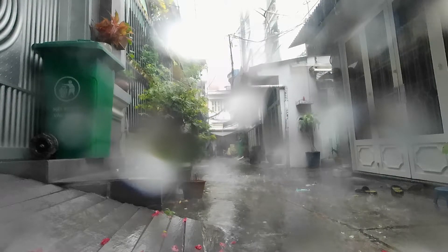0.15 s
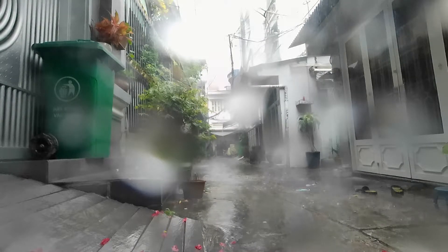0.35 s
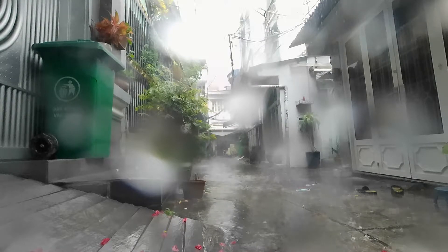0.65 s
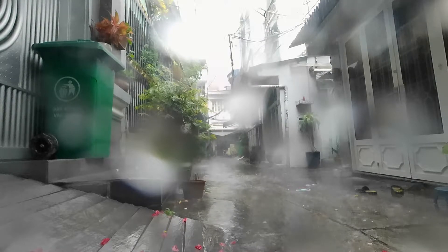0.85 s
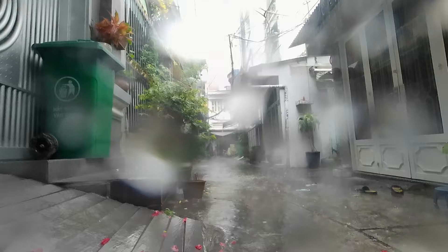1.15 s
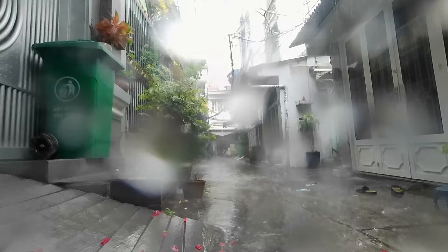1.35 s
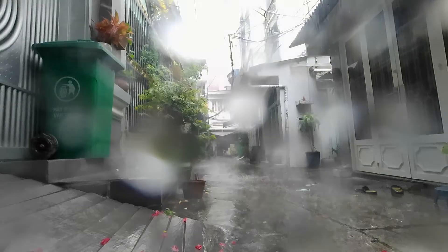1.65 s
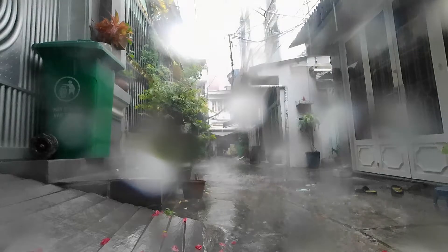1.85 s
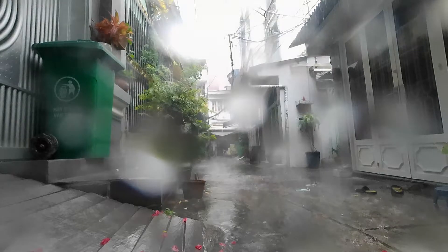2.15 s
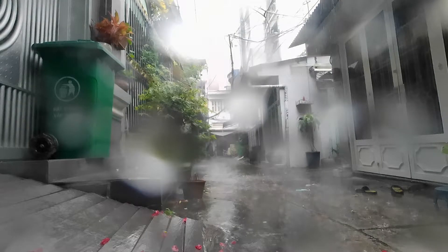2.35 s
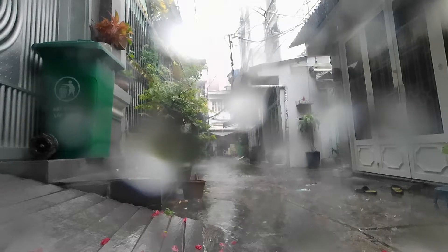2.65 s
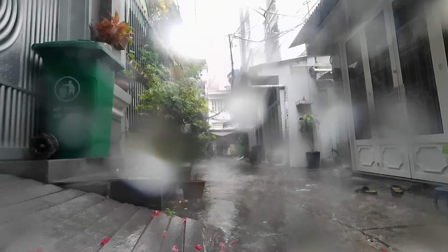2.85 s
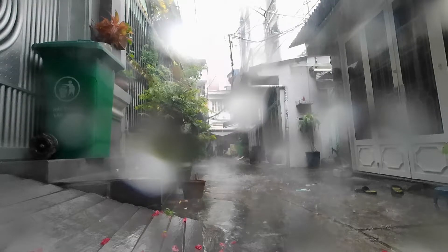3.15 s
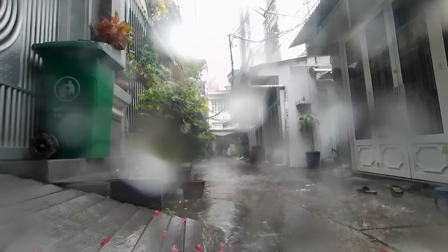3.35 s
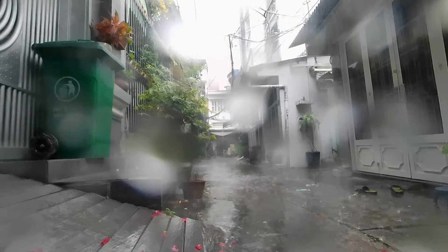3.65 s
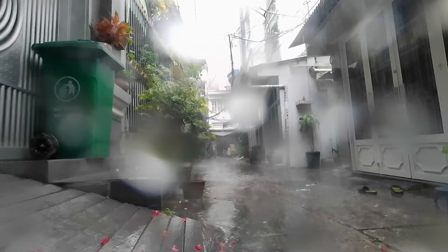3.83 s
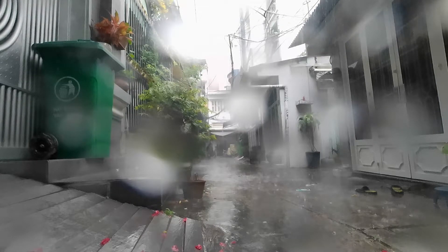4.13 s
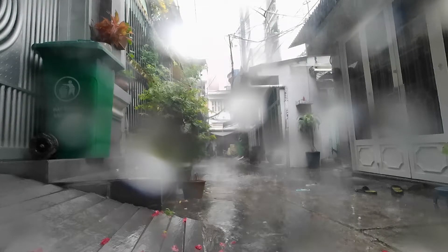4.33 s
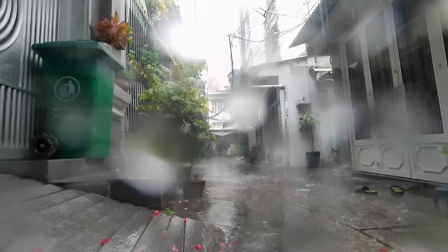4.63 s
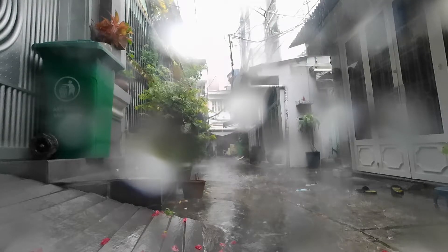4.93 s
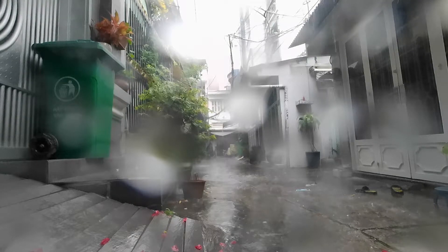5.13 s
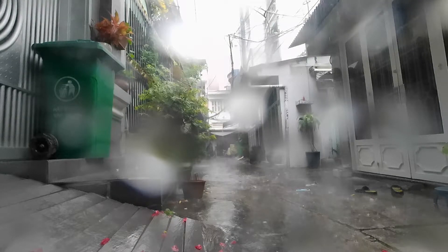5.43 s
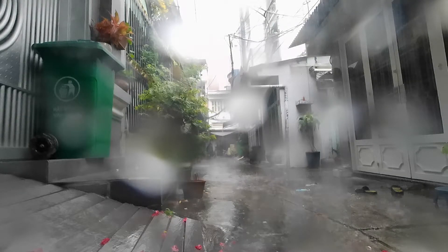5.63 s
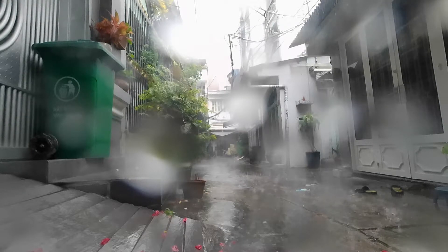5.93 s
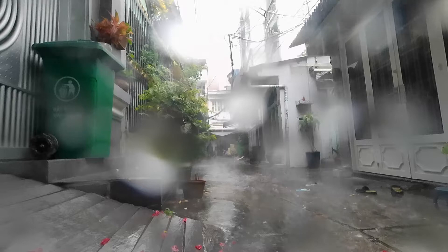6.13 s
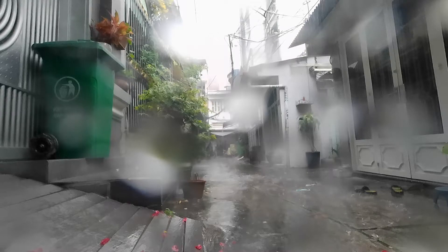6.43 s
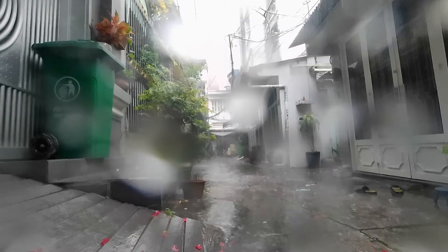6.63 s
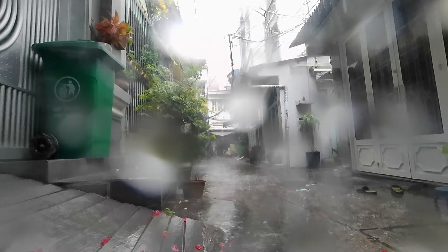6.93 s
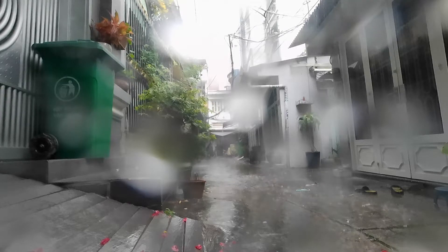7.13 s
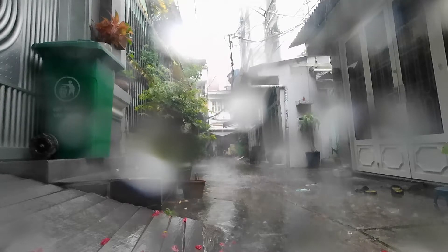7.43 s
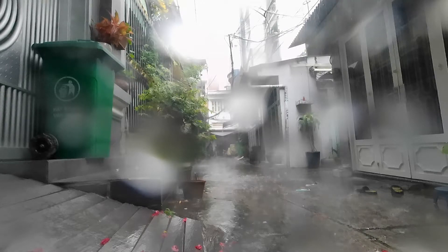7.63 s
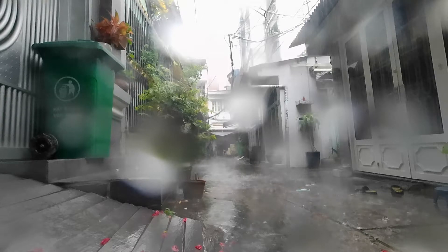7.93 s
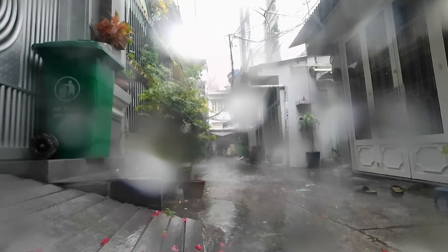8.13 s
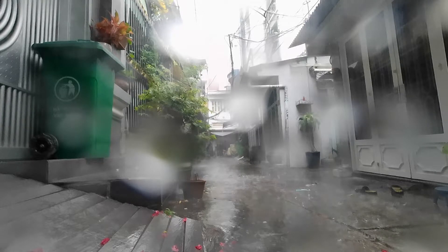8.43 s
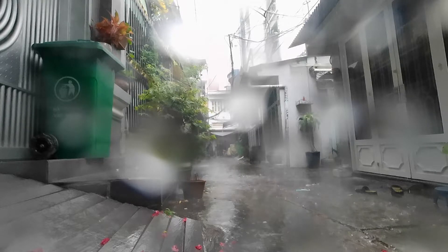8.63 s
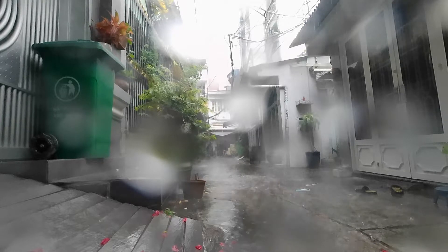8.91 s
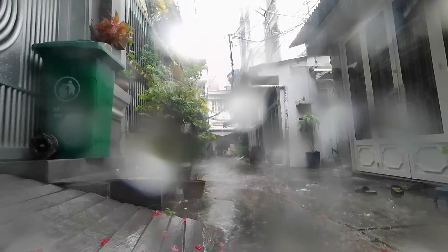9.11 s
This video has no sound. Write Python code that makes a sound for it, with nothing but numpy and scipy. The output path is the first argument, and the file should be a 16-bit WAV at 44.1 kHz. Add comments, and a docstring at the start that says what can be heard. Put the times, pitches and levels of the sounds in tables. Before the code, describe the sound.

Heavy rain hisses steadily in an alley while drops strike a small plastic housing with sharp, hollow ticks and knocks, growing harder and denser.

```python
"""Downpour on a plastic housing

Heavy rain in an alley, heard from inside a small plastic camera housing that stands in the open.
The downpour is a wavering hiss: noise shaped by the resonances of the hollow case.
Drops that land on the case ring its parts as decaying sines, mixed by where they land, plus a burst of spray.
The heavy ones set the mount humming and overload the microphone; fine droplets tick in between."""
import sys
import numpy as np
from scipy import signal
from scipy.fft import rfft, irfft
from scipy.io import wavfile
from scipy.ndimage import uniform_filter1d

SR = 44100
rng = np.random.default_rng(int(sys.argv[2]) if len(sys.argv) > 2 else 0)


def int16_out(signal):
    """Quantize to a 16-bit WAV file."""
    q = np.round(np.clip(np.atleast_2d(signal).T, -1, 1) * 32767)
    wavfile.write(sys.argv[1], SR, q.astype(np.int16))


N = 408807

# Tone of the downpour through the plastic. Each row: frequency in Hz, relative level in dB per Hz.
DOWNPOUR_TONE = [(20, -6.5), (65, -4.5), (110, -8.5), (170, -12), (330, -15), (480, -12.5), (700, -14.5),
                 (1050, -10.5), (2500, -27), (3700, -30.5), (5700, -21), (6800, -30), (10300, -29.5),
                 (12800, -36.5), (16000, -34.5)]
# Resonances the downpour excites in the case. Each row: centre in Hz, nominal width in Hz,
# peak in dB on the scale of the tone above.
HOLLOW_PEAKS = [(72.8, 8.8, 1), (222, 42, -12.5), (1215.6, 95, 1), (1563, 88, -8), (1780, 234, -5),
                (2047, 242, -7), (2953, 475, -11), (4047, 174, -12.5), (4690, 770, -15), (7930, 1500, -29)]
# Swell of the rain; only departures from the median count. Each row: time in seconds,
# strength in dB before scaling by SWELL_DEPTH.
SHOWER_SWELL = [(0.0, -47), (0.41, -48.5), (6.22, -48), (6.38, -47), (6.58, -48), (7.59, -47), (7.8, -46),
                (8.05, -47.5), (9.27, -47.5)]
# Large drops on the case; a square hit on bare plastic is bright, one cushioned by water is dull.
# Levels are rms over 10 ms. Each row: start in seconds, spot hit, strength in dB,
# brightness in dB per octave, splash level in dB, push on the mount in dB.
LARGE_DROPS = [(0.0413, "back", -43, 1.5, -47.5, -66.5), (0.0606, "shell", -38.5, 1, -42.5, -68),
               (0.1716, "shell", -49.5, 1, -57, -63), (0.56, "front", -35, -.6, -40, -44),
               (0.6856, "shell", -32.5, 0.8, -41, -53), (0.8964, "lid", -36.5, -.4, -70, -70),
               (0.91, "back", -53, 1, -49, -68), (1.1302, "shell", -41.5, 4, -41, -53),
               (1.145, "shell", -42, 0.5, -51, -60), (1.4263, "side", -35, -0.5, -52, -60),
               (1.4701, "back", -42.5, 1.5, -52, -61), (1.701, "side", -50, -2.5, -71, -69),
               (1.8663, "front", -49, 0, -55, -59), (2.038, "door", -35.5, 0, -70, -65),
               (2.1636, "latch", -36, -0.5, -63, -48.5), (2.3546, "shell", -44.5, 0.5, -42.5, -68),
               (2.79, "window", -38, 1.5, -46, -57), (2.836, "lid", -21.5, 0.5, -39.5, -46),
               (2.9454, "front", -21, 0.6, -26.5, -39.5), (2.985, "window", -43, 0, -48.5, -53),
               (3.3396, "front", -45.5, 0, -49, -62), (3.694, "back", -30.5, -.4, -46, -41.5),
               (3.85, "shell", -49, -1, -53, -70), (3.9524, "lid", -26.5, 0, -45, -51),
               (4.0204, "front", -36.5, 1, -46, -55), (4.084, "front", -15.5, -0.8, -21.5, -25),
               (4.223, "shell", -48, 0, -50.5, -68), (4.3693, "edge", -31.5, -1.4, -43.5, -41),
               (4.5993, "edge", -41, 2.5, -46, -44), (4.6296, "edge", -45.5, 0.5, -70, -68),
               (5.004, "foot", -58, -4.5, -68, -58), (5.209, "shell", -50, 0, -53, -70),
               (5.2274, "window", -44.5, 0.8, -56, -60), (5.2889, "side", -20.5, -0.5, -27.5, -41),
               (5.668, "shell", -49.5, 1, -50, -67), (5.8384, "door", -25.5, 0, -56, -44),
               (6.1855, "door", -44, -2, -70, -66), (6.2292, "shell", -21, -0.4, -30, -48),
               (6.299, "lid", -22.5, 1.2, -44, -55), (6.3873, "lid", -29.5, -1, -46.5, -58),
               (6.505, "lid", -23, -1.8, -43, -35), (6.539, "shell", -19.5, -1.1, -28.5, -28),
               (6.941, "side", -41, 1.3, -53, -46.5), (7.2101, "foot", -23, 0, -31, -28.5),
               (7.2662, "shell", -39, -2.5, -41.5, -47), (7.4621, "edge", -40.5, -2, -56, -47.5),
               (7.76, "lid", -19.5, -0.4, -31.5, -31), (7.817, "shell", -50, 0.5, -54, -70),
               (7.9376, "back", -50.5, 2, -53.5, -69), (8.197, "window", -49, -0.5, -70, -68),
               (8.352, "shell", -45, 1, -56.5, -68), (8.358, "back", -31, -0.1, -45, -32.5),
               (8.4485, "edge", -43, 3, -44.5, -66), (8.7187, "shell", -39.5, 0.5, -36, -40),
               (8.764, "front", -30.5, 1, -33.5, -52), (8.951, "window", -18, 0, -23, -26),
               (9.1003, "shell", -43, 0, -51, -66), (9.1034, "shell", -26.5, -1.6, -42, -53),
               (9.1956, "shell", -19.5, 1.5, -22, -35), (9.2151, "lid", -32, -.5, -55, -41),
               (9.252, "shell", -37, -0.2, -45, -48)]
# Where a drop lands decides which parts answer. Each spot: body, wall, door, cavity, lid, rim,
# window and shell, all in dB relative to the drop's strength.
SPOT_MIXES = {"lid": (-26, -21.5, -24, -22, 0.5, -6, -20.5, -15),
              "shell": (-14.5, -18, -19, -10, -7, -8, -12, 0),
              "front": (-13, -16.5, -24, 0, -9, -6.5, -8.5, -4.5),
              "back": (-9, -12, -12, -0.5, -3, -4, -8, -8),
              "side": (-11.5, -6.5, -18, -3.5, -8, -2, -10, -1.5),
              "door": (-22, -27, -8, 0, -7, -9, -26, -32), "edge": (-10, -16.5, -13.5, 0, -4, -20, -23, -8),
              "window": (-7, -16, -16.5, -11.5, -7.5, -7.5, 0, -5),
              "latch": (-4, -23.5, -1.5, -19, -12, -14, -25, -26),
              "foot": (0, -21.5, -11.5, -15, -3, 0, -4.5, -9)}
# Modes of the parts of the case. Each row: frequency in Hz, 60 dB decay time in seconds,
# level in dB relative to the other modes of that part.
MOUNT_MODES = [(68.9, 1.2, -6.5), (278.6, 0.33, -19.5), (726, 0.37, -23)]
BODY_MODES = [(232.5, 0.078, -4.5), (184, 0.028, 2), (283, 0.086, -22)]
WALL_MODES = [(447, 0.088, 0), (523.4, 0.11, 4), (634, 0.045, 2)]
DOOR_MODES = [(708, 0.042, -3.5), (859, 0.038, 0), (936, 0.076, -7.5)]
CAVITY_MODES = [(1240, 0.032, 4.4), (1460, 0.021, 0.5)]
LID_MODES = [(1598, 0.033, 7.5), (1686, 0.022, -4.5)]
RIM_MODES = [(1850, .015, -2), (2040, 0.019, -0.5), (2241, 0.024, -8.5)]
WINDOW_MODES = [(2836, 0.015, 2), (3058, 0.021, -0.26), (3306, 0.024, -2), (3660, 0.01, 1.9)]
SHELL_MODES = [(3996, 0.017, -4.5), (4310, 0.014, 1.5), (4640, 0.018, -7.5), (4865, 0.012, 4),
               (5425, 0.013, -5)]
# Spray of a bursting drop. Each row: frequency in Hz, relative level in dB per Hz.
SPRAY_TONE = [(1500, -13), (3500, -3), (5500, 1.5), (7500, -2), (10500, -7), (12500, -17), (15500, -19.5)]

DOWNPOUR_DB = -47
SWELL_DEPTH = 0.73  # share of the shower's swell that is heard
PIVOT_HZ = 1560  # brightness tilts the parts about this frequency
HEAVY_SPLASH_DB = -21.5  # a splash this loud or louder counts as full weight
TOP_HZ = 15700  # upper edge of the sound


def undb(db):
    """Decibels to gain."""
    return 10 ** (np.asarray(db) / 20)


def add(track, sound, at_s):
    """Mix a sound into a track at a given time."""
    start = int(np.clip(at_s * SR, 0, N - 1))
    track[start:start + len(sound)] += sound[:N - start]


def unit_hit(x):
    """Scale a hit to the energy of 10 ms at rms 1."""
    return x * np.sqrt(0.01 * SR / np.sum(x ** 2))


def noise(points, size, peaks=()):
    """Noise of rms 1 with a smooth spectrum and resonances on top."""
    f = np.fft.rfftfreq(size, 1 / SR)
    hz, db = np.transpose(points)
    power = undb(np.interp(np.log(f + 1), np.log(hz), db)) ** 2
    for centre, width, peak_db in peaks:
        offset = (f - centre) / (width / np.sqrt(2))
        power = power + (undb(peak_db) / (1 + offset ** 2)) ** 2
    x = irfft(rfft(rng.standard_normal(size)) * np.sqrt(power), size)
    return x / x.std()


def walk(rate):
    """Slow random wander of spread 1, from random steps (rate per second) smoothed twice."""
    step = int(SR / rate)
    x = np.repeat(rng.standard_normal(N // step + 1), step)
    x = uniform_filter1d(uniform_filter1d(x, step), step)[:N]
    return x / x.std()


def downpour(waver_db=0.75):
    """Countless drops on paving and roofs merge into a hiss that fills the hollow case."""
    s, db = np.transpose(SHOWER_SWELL)
    swell_db = SWELL_DEPTH * np.interp(np.arange(N) / SR, s, db - np.median(db))
    hiss = noise(DOWNPOUR_TONE, size=N, peaks=HOLLOW_PEAKS)
    return hiss * undb(DOWNPOUR_DB + swell_db + waver_db * walk(rate=11.0))


def ring(modes, rise_s, scatter=0.49, detune=0.0047, loose=1):
    """One part rings; random draws vary its modes' size, pitch and (if loose) phase from hit to hit."""
    hz, t60, db = np.transpose(modes)[:, :, None]
    t = np.arange(int(t60.max() * SR)) / SR
    share, shift, turn = rng.uniform(-1.11, 1, (3, len(modes), 1))
    size = undb(db) * (1 + scatter * share)
    decay = np.exp(-np.log(1000) * t / t60)
    waves = np.sin(2 * np.pi * hz * (1 + detune * shift) * t + np.pi * loose * turn)
    # the push builds up while the drop flattens
    push = 1 - np.exp(-(t / rise_s) ** 2)
    return unit_hit((size * decay * waves).sum(0) * push)


def splash(length_s, edge_db=0, rise_s=0.00045, tail_db=-20, tail_s=0.0053):
    """A drop bursts: brief spray, then a faint sizzle; edge_db adds treble, like an overloaded microphone."""
    tone = [(hz, db + edge_db * (hz / TOP_HZ) ** 2) for hz, db in SPRAY_TONE]
    spray = noise(tone, size=1024)
    t = np.arange(len(spray)) / SR
    burst = np.exp(-(t / length_s) ** 3)
    sizzle = undb(tail_db) * np.exp(-t / tail_s)
    return unit_hit(spray * (burst + sizzle) * (1 - np.exp(-t / rise_s)))


def drives(spot, strength_db, brightness_db):
    """Level of each part: the drop's strength, shared out by its spot and tilted by its brightness."""
    parts = (BODY_MODES, WALL_MODES, DOOR_MODES, CAVITY_MODES, LID_MODES, RIM_MODES, WINDOW_MODES, SHELL_MODES)
    hz = np.array([modes[0][0] for modes in parts])  # the first mode stands for its part
    return strength_db + np.array(SPOT_MIXES[spot]) + brightness_db * np.log2(hz / PIVOT_HZ)


def drops(spread_s=0.004, doubling_db=28, edge_db=16):
    """Large drops strike the case; a hard hit spreads longer and gets extra treble,
    like the harsh edge of an overloaded microphone."""
    out = np.zeros(N)
    for s, spot, strength_db, brightness_db, splash_db, mount_db in LARGE_DROPS:
        levels_db = drives(spot, strength_db, brightness_db)
        body_db, wall_db, door_db, cavity_db, lid_db, rim_db, window_db, shell_db = levels_db
        # 1 for the heaviest, halved for every doubling_db below
        weight = 2 ** (min(splash_db - HEAVY_SPLASH_DB, 0) / doubling_db)
        # every drop pushes the mount the same way, so a second one can feed or choke its hum
        add(out, undb(mount_db) * ring(MOUNT_MODES, rise_s=0.0039, scatter=0, detune=0, loose=0), s)
        add(out, undb(body_db) * ring(BODY_MODES, rise_s=0.0022, scatter=0.21), s)
        add(out, undb(wall_db) * ring(WALL_MODES, rise_s=0.00061, scatter=0.38), s)
        add(out, undb(door_db) * ring(DOOR_MODES, rise_s=0.00056, scatter=0.56), s)
        add(out, undb(cavity_db) * ring(CAVITY_MODES, rise_s=0.00075, scatter=0.11, detune=0.0024), s)
        add(out, undb(lid_db) * ring(LID_MODES, rise_s=0.00093), s)
        add(out, undb(rim_db) * ring(RIM_MODES, rise_s=0.00051, scatter=0.4, detune=0.016), s)
        add(out, undb(window_db) * ring(WINDOW_MODES, rise_s=0.00034, scatter=0.31, detune=0.046), s)
        add(out, undb(shell_db) * ring(SHELL_MODES, rise_s=0.0011, scatter=0.7, detune=0.03), s)
        add(out, undb(splash_db) * splash(spread_s * weight, edge_db * weight ** 2), s)
    return out


def droplets(count, db=-65, spread_db=6.0, splash_db=0, window_db=-5):
    """Fine spray ticks on shell and window at random times, most of it faint and a few ticks louder."""
    out = np.zeros(N)
    for when, chance in rng.random((count, 2)):
        s = when * N / SR
        gain = undb(db - spread_db * np.log(chance + 0.094))
        add(out, gain * ring(SHELL_MODES, rise_s=0.00025, scatter=0.6, detune=0.063), s)
        add(out, gain * undb(window_db) * ring(WINDOW_MODES, rise_s=0.0004, scatter=0.6, detune=0.039), s)
        add(out, gain * undb(splash_db) * splash(length_s=0.0013), s)
    return out


def scene():
    """Rain all around, spray and drops on the case."""
    return (downpour() + droplets(count=140) + drops())[None]


def record(dry):
    """The overloaded microphone flattens the hardest hits towards a ceiling; the top is cut."""
    ceiling = 0.58
    pressed = dry / (1 + (dry / ceiling) ** 6) ** (1 / 6)
    top_cut = signal.ellip(8, 0.2, 70, TOP_HZ, fs=SR, output="sos")
    return signal.sosfilt(top_cut, pressed)


dry = scene()
out = record(dry)
int16_out(out)
```